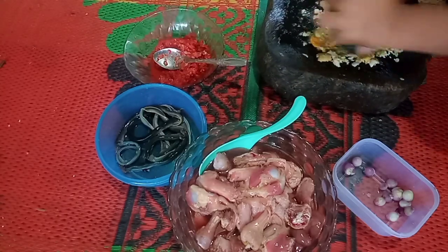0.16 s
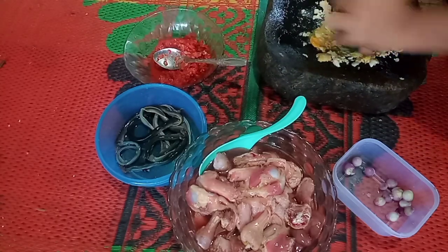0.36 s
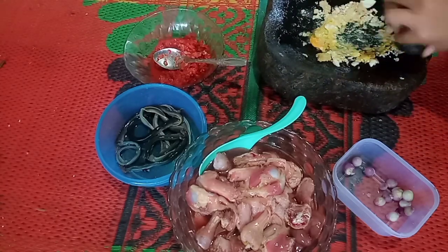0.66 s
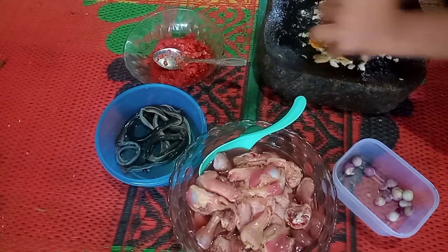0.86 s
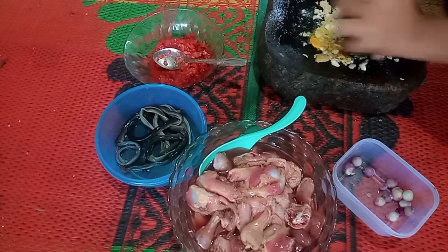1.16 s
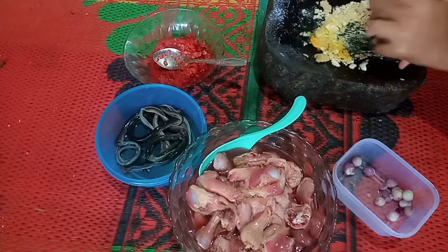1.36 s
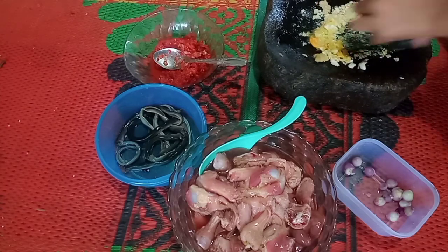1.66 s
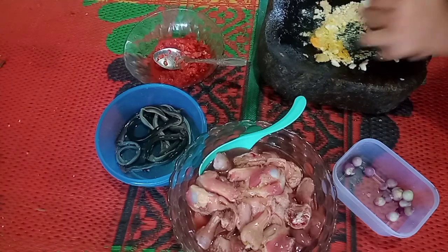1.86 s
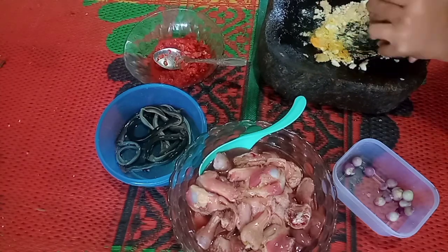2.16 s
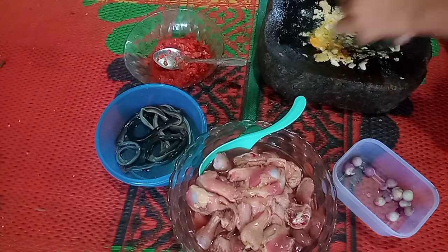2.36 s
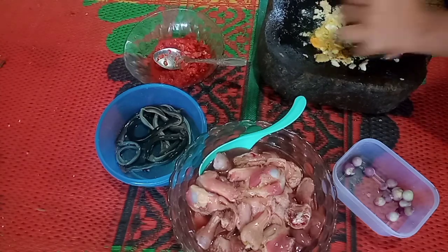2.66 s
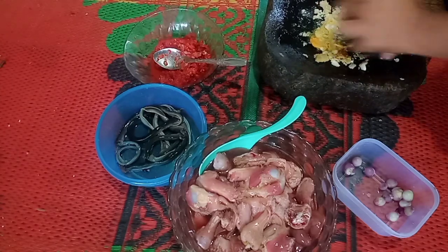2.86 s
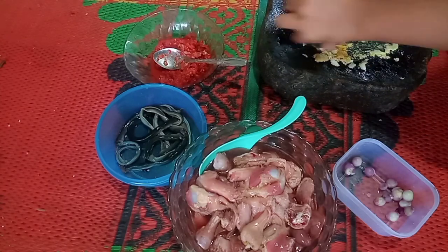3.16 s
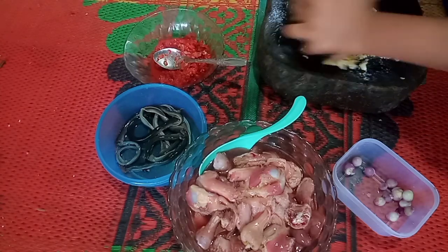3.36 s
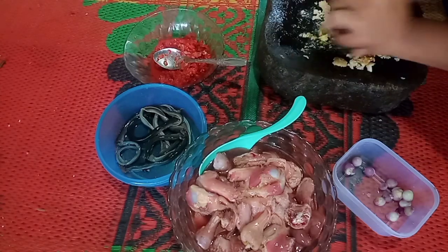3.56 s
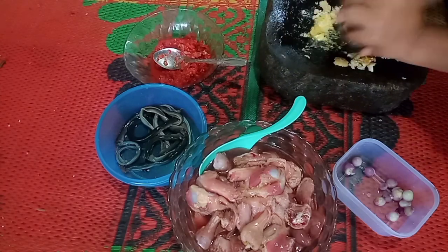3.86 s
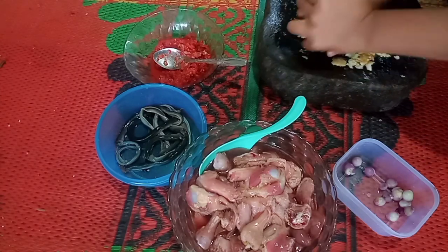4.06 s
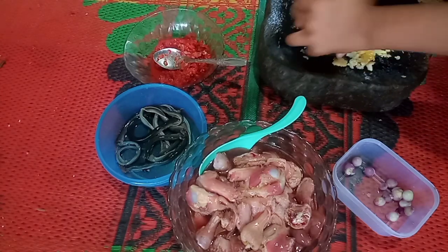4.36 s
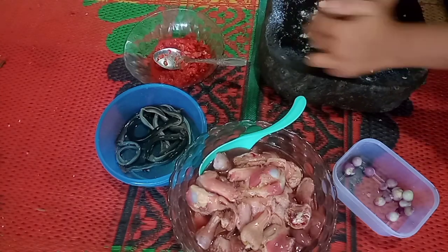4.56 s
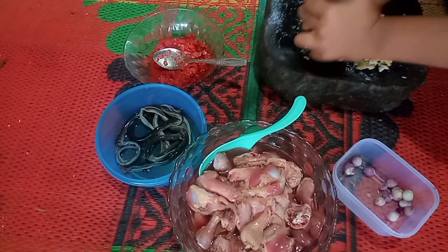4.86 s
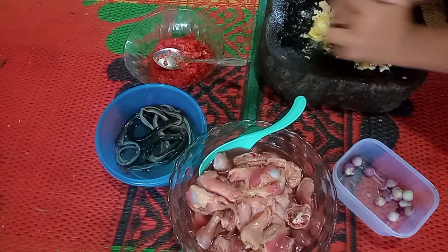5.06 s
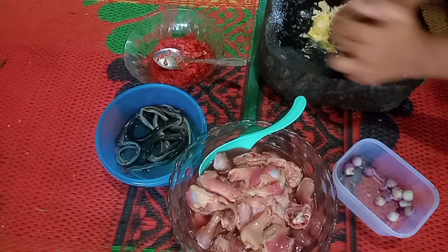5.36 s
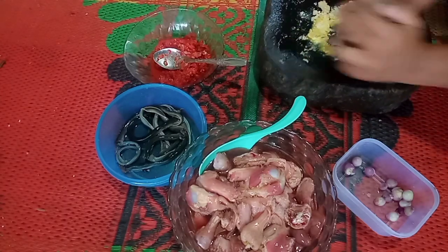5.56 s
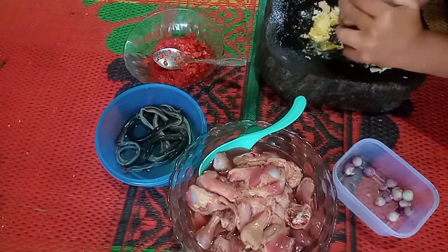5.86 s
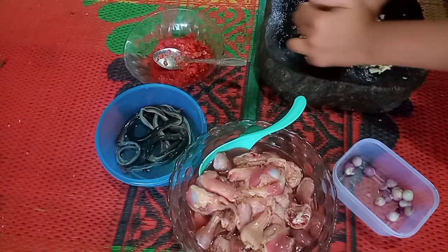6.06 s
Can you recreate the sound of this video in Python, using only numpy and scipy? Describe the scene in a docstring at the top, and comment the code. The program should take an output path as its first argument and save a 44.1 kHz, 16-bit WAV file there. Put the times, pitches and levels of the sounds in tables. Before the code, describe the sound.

A stone pestle grinds garlic and spices in a heavy stone mortar for about six seconds, heard close in a small kitchen. From the start, short uneven strokes come several times a second, each mixing gritty scraping with a moist crunch. Seeds snap now and then, and the mortar rumbles softly on its floor mat. Light stone taps gather between 1 and 3 seconds, and the grating is strongest from about 1.8 to 2.8 seconds. At 3.2 seconds comes the loudest sound, a sharp stone knock with a short ring, followed by a softer knock at 4.4 seconds. The later strokes are crunchier and slightly hollow, with a crisp crack at 5.5 seconds, and the grinding continues to the end. The near walls add a brief echo. Faint background noise, hiss and soft wavering tones sit underneath.

```python
"""A small hard-walled kitchen: a stone pestle works garlic and spices in a heavy stone mortar on a floor mat.
With each push, stone catches and slips on stone, moist pieces crunch, and the mortar rumbles on the mat.
Now and then the pestle knocks the bowl into a short ring, or a seed snaps.
The near walls answer, over faint background noise, hiss and wavering tones."""
import sys
import numpy as np
from scipy import signal
from scipy.fft import rfft, irfft, next_fast_len
from scipy.io import wavfile

SR = 44100
rng = np.random.default_rng(int(sys.argv[2]) if len(sys.argv) > 2 else 0)


def unload_wav(signal):
    """Save mono or channel-first audio to the path in sys.argv[1] as 16-bit WAV at rate SR, clipped to [-1, 1]."""
    wavfile.write(
        sys.argv[1],
        SR,
        np.round(np.clip(np.atleast_2d(signal).T, -1, 1) * 32767).astype(np.int16),
    )


N = 273331
TIME = np.arange(N) / SR

# pushes of the pestle, levels relative: t/s at full pressure, hold/s, grating/dB,
# brightness of the grating/dB, crunch/dB, hollow ring of the mortar/dB
PESTLE_STROKES = [ (0.002, 0.025, -55, 3, -53.5, -76), (0.118, 0.089, -58, 4.5, -55.5, -66),
                  (0.281, 0.068, -55.5, 10.5, -57, -75), (0.687, .03, -70, 16, -51.5, -92),
                  (0.726, 0.065, -51.5, 4.5, -56.5, -89), (0.922, 0.075, -51.5, 4, -58.5, -82),
                  (1.097, 0.064, -53, 13, -60, -82), (1.252, 0.09, -49, 1.5, -60, -86),
                  (1.434, 0.036, -52, 7, -57, -83), (1.788, 0.032, -94, 2, -54, -92),
                  (1.848, 0.088, -41.5, -7, -61.5, -63), (2.046, 0.047, -39, -1.5, -58.5, -73),
                  (2.191, 0.04, -44.5, -0.5, -56, -61), (2.309, 0.073, -66.5, 6, -78, -63),
                  (2.580, 0.016, -51.5, 2.5, -55.5, -72), (2.628, 0.027, -36, -13.5, -58, -53.5),
                  (2.802, 0.065, -46.5, 1.5, -56.5, -77), (2.96, 0.024, -54.5, 7.5, -56, -84),
                  (3.301, .11, -49.5, 4.5, -53, -64.5), (3.531, 0.076, -58.5, 6.5, -54, -84),
                  (3.747, 0.072, -57.5, 7, -54.5, -60), (3.893, 0.061, -54.5, -1, -55.5, -57.5),
                  (4.078, 0.08, -58.5, 4, -56, -60.5), (4.234, 0.061, -53.5, -1, -58.5, -62.5),
                  (4.376, 0.049, -58.5, -5.5, -67.5, -69), (4.539, 0.13, -64.5, 7.5, -56, -59.5),
                  (4.683, 0.052, -54.5, 6, -51, -62.5), (4.883, 0.054, -65, 7.5, -53.5, -63.5),
                  (5.046, 0.016, -51, -1, -53.5, -82), (5.158, 0.11, -75, -6, -69, -83),
                  (5.469, 0.094, -67, 11, -52.5, -63), (5.717, 0.079, -74.5, 8.5, -56.5, -64),
                  (5.884, 0.027, -71, 14, -55, -75), (5.954, 0.45, -69.5, 11, -64.5, -68.5), ]
GRATE_SLOPES_DB_PER_S, CRUNCH_SLOPES_DB_PER_S = (585.5, 259), (357, 220)  # attack, release


def amp(db):
    """Decibels to gain."""
    return 10 ** (np.asarray(db) / 20)


def unit(x):
    """Scale to rms 1."""
    return x / np.std(x)


def add(track, s, sound):
    """Mix a sound in at s seconds."""
    i = int(s * SR)
    track[i:i + len(sound)] += sound[:N - i]


def band(x, lo_hz, hi_hz, order=3):
    """Butterworth band-pass."""
    sos = signal.butter(order, [lo_hz, min(hi_hz, .45 * SR)], "band", fs=SR, output="sos")
    return signal.sosfilt(sos, x)


def convolve(x, response):
    """Pass a sound through an impulse response."""
    return signal.fftconvolve(x, response)[:N]


def colour(x, points, size=4096):
    """Minimum-phase EQ through points of f/Hz, gain/dB."""
    hz, db = np.transpose(points)
    f = np.maximum(np.arange(size // 2 + 1) * SR / size, 1)
    gain = amp(np.interp(np.log(f), np.log(hz), db))
    cepstrum = irfft(np.log(gain))
    cepstrum[1:size // 2] *= 2
    cepstrum[size // 2 + 1:] = 0
    return convolve(x, irfft(np.exp(rfft(cepstrum))))


def walk(rate):
    """Random modulator of spread 1 that glides to a new value `rate` times a second."""
    values = rng.standard_normal(4096)
    return unit(np.interp(TIME * rate, np.arange(len(values)), values))


def grains(rate, spread_db):
    """Random clicks, `rate` a second, with sizes scattered in dB."""
    hit = rng.random(N) < rate / SR
    size = amp(spread_db * np.clip(rng.standard_normal(N), -2, 2))
    return unit(hit * size * rng.choice([-1, 1], N))


def flicker(x, rate, depth_db, bands=24):
    """Neighbouring bands swell and fade on their own."""
    size = next_fast_len(N + 2048)
    spectrum = rfft(x, size)
    hz = np.arange(len(spectrum)) * SR / size
    position = np.interp(np.log1p(hz), np.log([500, 12000]), [0, bands - 1])
    out = np.zeros(N)
    for k in range(bands):
        triangle = np.maximum(1 - abs(position - k), 0)
        out += irfft(spectrum * triangle, size)[:N] * amp(depth_db * walk(rate))
    return out


def waver(x, share, rate):
    """All pitches of a sound drift up and down together."""
    return np.interp(TIME + np.cumsum(share * walk(rate)) / SR, TIME, x)


def pushes(levels_db, attack_db_per_s, release_db_per_s, arch_db=1):
    """Envelope of all strokes, one level each: a quick bite, an arched hold and a slower release."""
    t, power = TIME[::32], 0
    for (s, hold, *_), db in zip(PESTLE_STROKES, levels_db):
        arch = arch_db * (np.sin(np.pi * np.clip((t - s) / hold, 0, 1)) - 1)
        edges = attack_db_per_s * np.maximum(s - t, 0) + release_db_per_s * np.maximum(t - s - hold, 0)
        power = power + amp(db + arch - edges) ** 2
    return np.interp(TIME, t, np.sqrt(power))


def background():
    """Faint noise whose bands swell and fade at random, a narrow drone and a steady high hiss."""
    # spectra of the background noise and the hiss: f/Hz, relative level/dB
    noise_eq = [(25, -12.5), (120, 3), (260, -11), (360, 5.5), (500, -15.5), (900, -9.5), (1600, -1.5),
                (3500, -3), (4400, -7.5), (5400, -26.5), (15000, -57)]
    hiss_eq = [(2000, -22.5), (5400, -40.5), (6700, -6.5), (8300, 5), (10200, -10.5), (15000, -16.5)]
    noise = unit(flicker(colour(rng.standard_normal(N), noise_eq), rate=13, depth_db=6))
    drone = unit(band(rng.standard_normal(N), 614, 858)) * amp(2 * walk(38))
    hiss = unit(colour(rng.standard_normal(N), hiss_eq))
    return amp(-67) * noise + amp(-80.5) * drone + amp(-79) * hiss


def faint_tones():
    """Soft background tones swell and fade, unsteady in pitch and strength."""
    # tone swells: t/s at the middle, length/s, f/Hz, level/dB
    swells = [(0.06, 0.5, 627, -56.5), (0.888, 0.21, 700, -56), (1.651, 0.081, 707, -58),
              (1.812, 0.12, 505, -56), (2.344, 0.4, 604, -61.5), (5.161, 0.041, 614, -61),
              (5.362, 0.21, 689, -59.5), (5.617, 0.24, 687, -60.5), (5.803, 0.12, 692, -56.5),
              (5.97, 0.92, 695, -65)]
    phase_per_hz = 2 * np.pi * np.cumsum(1 + .04 * walk(110)) / SR
    shimmer_db = 4.5 * walk(60)
    phase_jitter = 0.59 * walk(90)
    out = np.zeros(N)
    for s, length, hz, db in swells:
        swell = np.cos(np.pi * np.clip((TIME - s) / length, -.5, .5)) ** 2
        out += amp(db + shimmer_db) * swell * np.sin(hz * phase_per_hz + phase_jitter)
    return out


def rocking(bump_t60=0.035):
    """The mortar rumbles on the mat, rings hollow under each push and once settles with a bump."""
    # weight of the arm rocking the mortar: t/s, relative level/dB
    arm_weight = [(0.0, -60), (0.57, -59), (0.62, -71.5), (0.78, -54.5), (0.81, -63), (1.05, -56),
                  (1.09, -65), (1.57, -60.5), (1.66, -76), (1.85, -56), (2.21, -64.5), (2.73, -58.5),
                  (2.81, -72), (2.88, -57.5), (3.11, -70), (3.25, -60), (3.73, -60), (3.76, -53.5),
                  (4.11, -65.5), (4.16, -54), (4.31, -64.5), (4.77, -57.5), (5.54, -60.5), (6.02, -55.5),
                  (6.16, -61), (6.2, -60)]
    # the mortar settling: t/s, level/dB, f/Hz
    bumps = [(1.006, -40.5, 504)]
    weight_db = np.interp(TIME, *np.transpose(arm_weight))
    pushed = pushes([hollow_db for *_, hollow_db in PESTLE_STROKES], *CRUNCH_SLOPES_DB_PER_S)
    rumble = unit(band(grains(rate=770, spread_db=3.5), 55.7, 157) * amp(2 * walk(12)))
    hollow = unit(band(grains(rate=750, spread_db=-1), 310, 505, order=2))
    out = amp(weight_db - 0.1) * rumble + amp(-4.06) * pushed * hollow
    t = TIME[:SR // 4]
    for s, db, hz in bumps:
        add(out, s, amp(db - 60 * t / bump_t60) * np.sin(2 * np.pi * hz * t))
    return out


def snaps(split_s=0.00046, second_gain=0.24):
    """A crisp piece breaks in two quick cracks; the harder the piece, the louder and brighter."""
    # seeds and crisp pieces breaking: t/s, relative level/dB
    breaks = [(0.3304, -37), (0.6195, -45), (0.789, -31), (0.918, -35.5), (1.0813, -36), (1.2471, -43),
              (1.3706, -31), (2.5287, -38.5), (2.8463, -32.5), (3.5405, -29), (3.7935, -30),
              (4.2417, -32.5), (4.9435, -32.5), (5.5061, -22.5), (5.8815, -34), (6.003, -36), (6.178, -40)]
    # spectrum of a crack: f/Hz, relative level/dB
    crack_eq = [(400, -32), (1000, -9), (1700, -16), (3600, 4), (5300, -17), (7200, -12.5), (10000, -30),
                (12000, -24), (15000, -24)]
    crack = colour(signal.unit_impulse(N), crack_eq)[:2048]
    crack = crack / abs(crack).max()
    out, hardest_db = np.zeros(N), max(db for s, db in breaks)
    for s, db in breaks:
        cutoff_hz = 15000 * amp(.5 * (db - hardest_db))
        sound = amp(db) * signal.lfilter(*signal.butter(2, cutoff_hz, fs=SR), crack)
        add(out, s, sound)
        add(out, s + split_s, second_gain * sound)
    return out


def stone(force):
    """The stone passes the contact on at once and rings briefly in its modes."""
    # resonances of mortar and pestle: f/Hz, width/Hz, gain/dB
    modes = [(470, 12, 10), (671, 31, 7), (790.4, 17, 5.5), (895, 57, 3.5), (969.5, 9, 5), (1049.7, 26, 10),
             (1167, 32, 7), (1324, 88, 4), (1382, 31, 8.5), (1453, 48, 12), (1568, 17.5, 17),
             (1699, 17, 7.5), (1823, 53, -6.5), (2010, 93, 3.5), (2320, 34, -8), (2368, 200, 6),
             (2440, 40, 7.5), (3480, 140, 2.5)]
    ring = sum(amp(db) * band(force, hz - width / 2, hz + width / 2, order=1) for hz, width, db in modes)
    return force + ring


def disperse(x, hz=1150, width_hz=1100):
    """All-pass: slow bending waves in the bowl arrive after the first crack."""
    radius = np.exp(-np.pi * width_hz / SR)
    feedback = [1, -2 * radius * np.cos(2 * np.pi * hz / SR), radius * radius]
    return signal.lfilter(feedback[::-1], feedback, x)


def contacts(hard_db=-20, bounces=2, first_gap_s=0.0054, gap_ratio=.9, loss_db=5):
    """Every hit of pestle on bowl: a hard blow bounces, each time sooner and weaker."""
    # the pestle striking the bowl: t/s, relative peak/dB, contact time/s
    strikes = [(0.266, -39, .0004), (0.963, -36, .0004), (1.012, -33, .0004), (1.051, -39, .0004),
               (1.110, -32, .0004), (1.289, -28, .0005), (1.418, -31, .0004), (1.833, -30, .0006),
               (1.850, -27, .0005), (1.909, -27, .0008), (2.020, -36, .0005), (2.086, -24, .0005),
               (2.580, -35, .0007), (2.623, -26, .0006), (2.664, -26, .0008), (2.790, -35, .0005),
               (3.002, -32, .0007), (3.2358, -8.3, .00033), (4.4423, -17.5, .00066),
               (4.5481, -26.5, .00066)]
    for s, db, contact_s in strikes:
        yield s, db, contact_s
        for k in range(bounces if db > hard_db else 0):
            s, db = s + first_gap_s * gap_ratio ** k, db - loss_db
            yield s, db, contact_s


def knocks(skid_db=-28, skid_t60=0.49):
    """A blow is a short push, longer and duller when paste cushions it; the pestle then skids on grit."""
    # spectrum of the struck bowl: f/Hz, relative level/dB
    blow_eq = [(60, -33), (200, -12), (300, -13), (540, -9), (740, 5), (1100, -3), (1400, -2.5), (2400, -3),
               (2900, -7), (3500, -6.5), (4300, -17), (5300, -34), (8000, -47), (15000, -42)]
    bowl = colour(disperse(stone(signal.unit_impulse(N))), blow_eq)[:SR // 2]
    out, skid_power, t = np.zeros(N), np.zeros(N), TIME[:SR // 2]
    for s, db, contact_s in contacts():
        force = np.sin(np.pi * np.minimum(t / contact_s, 1)) ** 2
        blow = signal.fftconvolve(force, bowl)
        add(out, s, amp(db + 1.5) * blow / abs(blow).max())
        add(skid_power, s, amp(db - 60 * t / skid_t60) ** 2)
    grit = unit(band(colour(grains(rate=650, spread_db=8), blow_eq), 170, 2600))
    return out + amp(skid_db) * np.sqrt(skid_power) * grit


def crushing(pops_per_s=70, pops_db=-31.5):
    """Moist cells burst in a crackle that thickens under pressure; fibres tear in ticks, juice pops."""
    # spectrum of the crunch: f/Hz, relative level/dB
    crunch_eq = [(300, -34), (700, -28), (1400, -13.5), (2200, -0.5), (2900, 0.5), (3700, 1), (4400, -3),
                 (5300, -18.5), (6700, -15.5), (8300, -20.5), (10000, -34), (12000, -39), (15000, -35.5)]
    level = pushes([crunch_db for *_, crunch_db, _ in PESTLE_STROKES], *CRUNCH_SLOPES_DB_PER_S)
    pressure = np.sqrt(level / level.max())
    bursts = grains(rate=600 + 4500 * pressure, spread_db=1) * amp(2.5 * walk(140))
    ticks = grains(rate=55, spread_db=1.5)
    # pockets in the paste open and close, so the colour keeps shifting
    crackle = flicker(colour(bursts + amp(-10.5) * ticks, crunch_eq), rate=35, depth_db=3.5)
    pops = unit(band(grains(rate=pops_per_s * pressure, spread_db=2), 4500, 14000, order=1))
    return level * (amp(3) * unit(crackle) + amp(pops_db) * pops)


def grinding(crossover_hz=1170):
    """Pits of the two stones catch and slip in spurts; bare stone is brighter than stone under paste."""
    # spectrum of stone grating on stone: f/Hz, relative level/dB
    grate_eq = [(100, -16), (280, -48), (550, -10), (720, 4), (900, 5), (1130, 0.5), (1400, -1.5),
                (1850, 1), (2300, -17), (3000, -24), (3600, -8.5), (4500, -61.5), (9000, -42)]
    _, _, level_db, bright_db, _, _ = np.transpose(PESTLE_STROKES)
    body_gain = pushes(level_db, *GRATE_SLOPES_DB_PER_S)
    edge_gain = pushes(level_db + bright_db, *GRATE_SLOPES_DB_PER_S)
    slips = grains(rate=1200, spread_db=-0.5) * amp(2 * walk(130))
    ring = waver(stone(slips), share=.018, rate=9)  # the ring moves as grip and contact change
    # the point of contact travels, so different modes speak in turn
    grate = flicker(colour(ring, grate_eq), rate=22, depth_db=4)
    body = signal.sosfiltfilt(signal.butter(6, crossover_hz, fs=SR, output="sos"), grate)
    return amp(-0.54) * body_gain * unit(body) + amp(0.38) * edge_gain * unit(grate - body)


def kitchen(x, wet_db, t60_low=0.14, t60_high=0.26, build_s=0.0034):
    """Dense echoes of near walls, with one decay time for the low band and one for the treble."""
    t = TIME[:int(.7 * SR)]
    low = band(rng.standard_normal(len(t)), 130, 2500, order=2)
    high = band(rng.standard_normal(len(t)), 2100, 15000, order=2)
    low_decay, high_decay = amp(-60 * t / t60_low), amp(-60 * t / t60_high)
    tail = (low * low_decay + high * high_decay) * (1 - np.exp(-t / build_s))
    return x + amp(wet_db) * convolve(x, tail / np.sqrt(np.sum(low_decay ** 2)))


def scene():
    """Strokes, knocks and snaps sound in the kitchen; the mortar rumbles underneath."""
    strokes = kitchen(grinding() + crushing(), wet_db=-15.5)
    blows = kitchen(knocks(), wet_db=-4.5, t60_low=0.37)
    cracks = kitchen(snaps(), wet_db=-13)
    return (strokes + blows + cracks + rocking() + background() + faint_tones())[None]


def record(dry):
    """A steep low-pass takes off the top end."""
    top_hz = 15600
    return signal.sosfilt(signal.ellip(10, .2, 70, top_hz, fs=SR, output="sos"), dry)


dry = scene()
out = record(dry)
unload_wav(out)
```